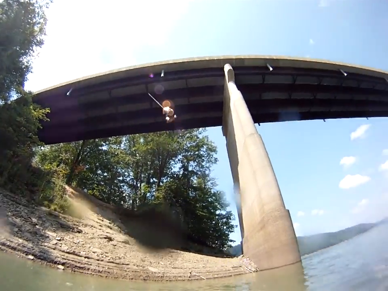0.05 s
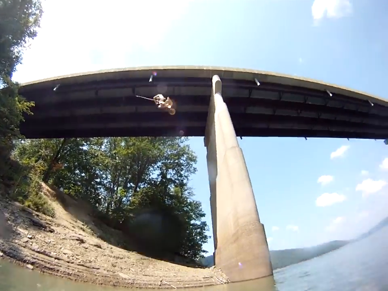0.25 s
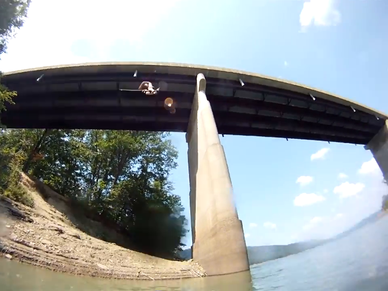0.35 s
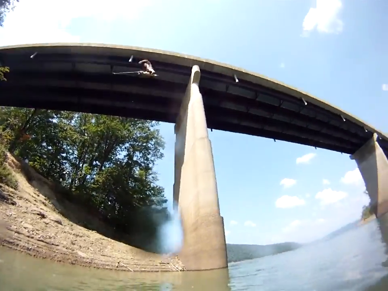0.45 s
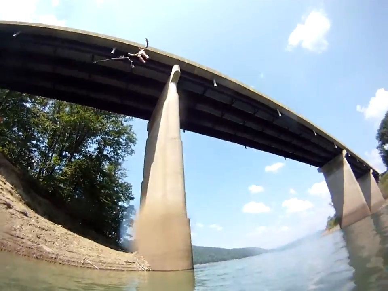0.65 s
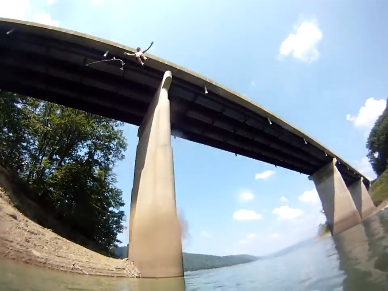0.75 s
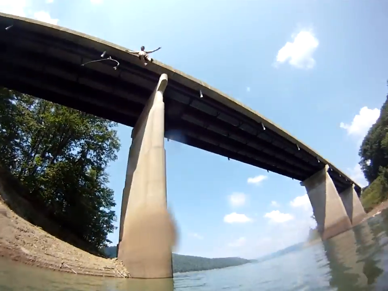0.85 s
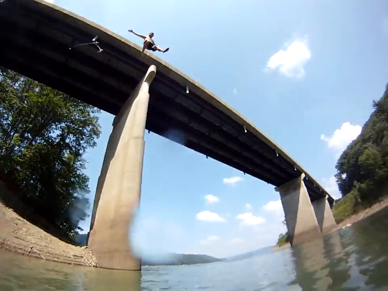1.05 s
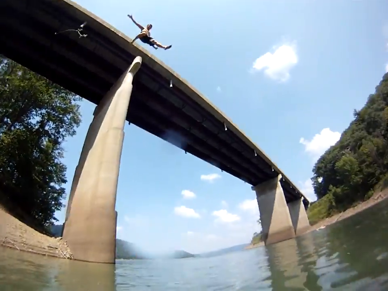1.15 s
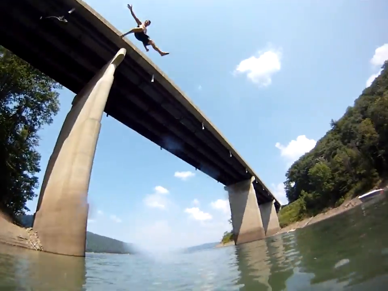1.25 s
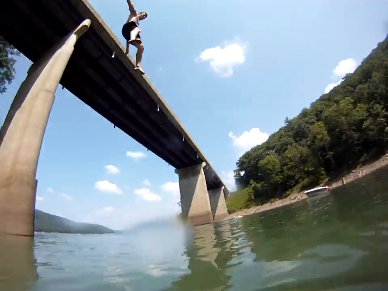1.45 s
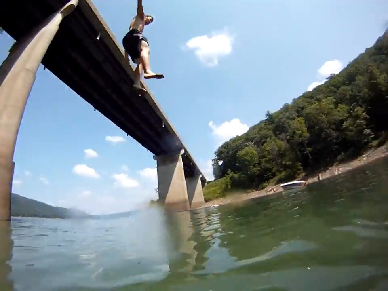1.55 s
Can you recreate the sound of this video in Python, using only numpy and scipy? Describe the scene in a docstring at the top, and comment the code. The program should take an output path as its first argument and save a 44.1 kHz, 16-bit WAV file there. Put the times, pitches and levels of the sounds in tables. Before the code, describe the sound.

A sharp splash knocks right against a microphone housed at the surface of a calm lake. Water briefly sloshes across with a glassy edge and pulls away with a gulp, leaving light drops, gentle lapping and a soft rumble.

```python
"""A quiet lake, where a camera in a waterproof housing bobs at the surface.
Water slaps the housing twice and sets it ringing, washes over it and lets go with a low gulp.
Drops spatter and small bubbles ring over a bed of fine lapping, a faint hollow tone and soft rumble.
A coarse converter mirrors the sound into the treble, which adds a glassy edge."""
import sys
import numpy as np
from scipy import signal
from scipy.fft import rfft, irfft
from scipy.io import wavfile

SR = 44100
rng = np.random.default_rng(int(sys.argv[2]) if len(sys.argv) > 2 else 0)


def log_audio(samples):
    """Write samples as a 16-bit WAV file to the path given in sys.argv[1]."""
    # one column per channel
    frames = np.atleast_2d(samples).T
    # limit to full scale, then quantise
    limited = np.clip(frames, -1, 1)
    pcm = np.round(limited * 32767).astype(np.int16)
    wavfile.write(sys.argv[1], SR, pcm)


N = 70560  # 1.6 s


def undb(db):
    """Decibels to gain."""
    return 10 ** (np.asarray(db) / 20)


def fader(t, points):
    """Gain that rides through (time_s, level_db) points."""
    return undb(np.interp(t, *np.array(points).T))


def swell(t, peak_s, width_s):
    """Bell-shaped envelope that peaks at 1."""
    return np.exp(-.5 * ((t - peak_s) / width_s) ** 2)


def coloured(points, grain_db=0):
    """Unit noise shaped by (freq_hz, gain_db) points; grain roughens it towards a dense crackle."""
    hz, db = np.array(points, float).T
    freqs = np.maximum(np.fft.rfftfreq(N, 1 / SR), 1)
    white = rng.standard_normal(N)
    grains = np.repeat(rng.exponential(size=N // 16 + 1), 16)[:N]  # a new level every 16 samples
    eq = undb(np.interp(np.log(freqs), np.log(hz), db))
    rolloff = 1 + (freqs / hz[-1] / 1.2) ** 8
    noise = irfft(rfft(white * undb(grain_db * grains)) * eq / rolloff, N)
    return noise / noise.std()


def resonant(hz, width_hz):
    """Unit noise ringing in one resonance."""
    noise = signal.lfilter(*signal.iirpeak(hz, hz / width_hz, fs=SR), rng.standard_normal(N))
    return noise / noise.std()


# Deep tone of the rumble: freq_hz, gain_db
RUMBLE_COLOUR = [(12, -7), (25, 10.5), (45, 4.5), (70, -4), (100, -15), (150, -20.5), (250, -38),
                 (500, -47)]
# Its slow swells: time_s, level_db
RUMBLE_FADER = [(0, -40), (.2, -42.5), (.4, -41.5), (.65, -38.5), (.9, -43), (1.25, -40.5), (1.6, -44)]

def rumble(t):
    """The housing rumbles as it moves through the water."""
    return coloured(RUMBLE_COLOUR) * fader(t, RUMBLE_FADER)


# Two soft rises of the hollow tone: time_s, level_db
HOLLOW_FADER = [(0, -80), (.5, -76.5), (.65, -65.5), (.9, -73.5), (1.05, -74.5), (1.13, -64.5), (1.29, -64),
                (1.36, -75), (1.6, -70)]

def hollow_tone(t):
    """A faint, narrow band of noise drifts in and out."""
    return resonant(hz=2150, width_hz=55) * fader(t, HOLLOW_FADER)


# Tone of the lapping: freq_hz, gain_db
LAPPING_COLOUR = [(120, -29.5), (200, -1), (353, -8), (1040, -12.5), (1320, -13.5), (1510, -9),
                  (1840, -11.5), (2260, -10.5), (3070, -17), (3530, -16), (5500, -25), (7150, -59.5),
                  (12100, -120)]
# Its ebb and flow: time_s, level_db
LAPPING_FADER = [(0, -62.5), (.2, -59), (.44, -56.5), (.468, -67), (.5, -63), (.55, -57), (.69, -57.5),
                 (.76, -59), (1.0, -60), (1.25, -61), (1.46, -60), (1.6, -60)]

def lapping(t):
    """Lapping water lays a fine, grainy bed."""
    return coloured(LAPPING_COLOUR, grain_db=1.5) * fader(t, LAPPING_FADER)


# Bubbles, from low gulps to tiny plinks: start_s, level_db, pitch_hz, decay_s, rise_per_s
BUBBLE_NOTES = [(.268, -25, 128, .013, 0.5), (.4245, -15, 510, 0.0019, 1), (0.6, -46, 3130, .002, 3),
                (0.791, -45, 1563, .004, 3.6), (0.806, -47.5, 1502, 0.01, 11.5),
                (.886, -39, 3095, 0.0021, 1), (1.006, -42, 3450, 0.0027, 3.9),
                (1.023, -46.5, 1598, .010, 22)]

def bubbles(t, attack_s=0.00065):
    """Bubbles ring and rise in pitch as they near the surface."""
    out = np.zeros(N)
    for start_s, level_db, pitch_hz, decay_s, rise_per_s in BUBBLE_NOTES:
        age = np.maximum(t - start_s, 0)
        envelope = (1 - np.exp(-age / attack_s)) * np.exp(-age / decay_s)
        phase = 2 * np.pi * pitch_hz * age * (1 + rise_per_s * age / 2)
        out += undb(level_db) * envelope * np.sin(phase)
    return out


# Bright tone of the spatter: freq_hz, gain_db
SPATTER_COLOUR = [(300, -24.5), (1200, -12.5), (2150, 2), (2800, -6.5), (3400, -1), (4100, -13.5),
                  (4700, -5), (5800, 0)]
# Drops landing: peak_s, level_db, width_s, ring_hz, ring_over_spatter_db
DROP_HITS = [(0.277, -43, .0007, 3640, -4), (0.424, -39.5, 0.0024, 3410, 7), (.602, -49, 0.0018, 3300, 2),
             (0.611, -48, .004, 2100, -6), (0.652, -51, 0.0051, 2060, -2.5),
             (.791, -50.5, 0.0013, 4570, -4.5), (.810, -61, 0.0018, 4300, 0),
             (0.826, -47, .0016, 2040, 0.5), (1.394, -53.5, 0.0034, 2235, 1.5),
             (1.436, -52, .003, 4780, -0.5)]

def drops(t):
    """Each drop on the housing is a brief spatter with a ring of its own."""
    out, spatter = np.zeros(N), coloured(SPATTER_COLOUR)
    for peak_s, level_db, width_s, ring_hz, ring_over_spatter_db in DROP_HITS:
        ring = undb(ring_over_spatter_db) * resonant(ring_hz, width_hz=180)
        out += undb(level_db) * swell(t, peak_s, width_s) * (spatter + ring)
    return out


# Tone of the running sheet of water: freq_hz, gain_db
SHEET_COLOUR = [(150, -3), (400, -6), (700, -7.5), (1080, 3), (1400, -4), (1800, -3), (2150, 5),
                (2500, -10), (2900, -12), (3450, -5), (4300, -21), (5300, -16.5), (5900, -30)]
# Its sloshing, ahead of the trim: time_s, level_db
SHEET_FADER = [(.265, -42.5), (.285, -46.5), (.31, -41.5), (.335, -40), (.358, -36), (.375, -46),
               (.391, -34), (.407, -43.5), (.424, -32), (.437, -36.5), (.455, -45.5)]
# Dark tone of the churn: freq_hz, gain_db
CHURN_EQ = [(60, 10), (250, -3.5), (400, 0), (580, -9.5), (800, -9.5), (1200, -14.5), (3400, -28.5),
            (5500, -49)]

def wash(t, start_s=.262, end_s=.459, fade_s=0.0055, sheet_trim_db=-0.5):
    """A grainy sheet of water runs over the housing, churns and breaks off."""
    peak_s, build_s, fall_s, churn_db = .426, 0.015, 0.0031, -21.5
    gate = np.clip((t - start_s) / fade_s, 0, 1) * np.clip((end_s - t) / fade_s, 0, 1)
    sheet = coloured(SHEET_COLOUR, grain_db=1.5) * fader(t, SHEET_FADER) * undb(sheet_trim_db)
    churn_envelope = np.exp(np.minimum((t - peak_s) / build_s, (peak_s - t) / fall_s))
    churn = coloured(CHURN_EQ) * undb(churn_db) * churn_envelope
    return gate * (sheet + churn)


# Gulps as water pulls off the housing: centre_s, level_db, edge_s, decay_s
GULPS = [(.2652, -11.5, 0.0041, 0.0022), (.3585, -15.5, 0.0033, .007), (0.4287, 0.5, .0016, 0.0036),
         (0.598, -19.5, 0.006, 0.0078), (0.637, -24.5, 0.0041, 0.0076), (.688, -27, 0.0073, 0.0099),
         (1.552, -31.5, 0.0021, 0.0066)]
# Dull pushes of water: peak_s, level_db, width_s
THUDS = [(.2440, -26, 0.0025), (0.2563, -9, 0.001), (0.3928, -24.5, 0.00099), (0.409, -20, 0.0044)]

def pressure(t):
    """Water sucks at the housing and snaps back, or simply pushes on it."""
    gulps = sum(undb(level_db) * np.tanh((t - centre_s) / edge_s) * np.exp(-abs(t - centre_s) / decay_s)
                for centre_s, level_db, edge_s, decay_s in GULPS)
    thuds = sum(undb(level_db) * swell(t, peak_s, width_s) for peak_s, level_db, width_s in THUDS)
    return gulps + thuds


# Ringing modes of the housing: pitch_hz, gain_db, t60_s
HOUSING_MODES = [(484, -13.5, 0.024), (860, -16, .02), (1082, -11.5, 0.026), (1730, -10, .02),
                 (2127, -3.5, 0.026), (2869, -2.5, .014), (3430, -11, 0.023), (4495, -6.5, 0.0047)]
# Tone of the crack in a slap: freq_hz, gain_db
CRACK_COLOUR = [(100, -1), (400, 1), (600, 1), (850, 2.5), (1200, -0.5), (2700, -2), (3600, -5), (4500, -5),
                (5800, -12)]
# Hard slaps, then faint ticks: start_s, level_db, pitch_hz, hold_s, roughness (0-1)
SLAP_HITS = [(0.2463, 0.5, 2000, 0.0029, .3), (.2559, -5.5, 1580, 0.001, .2),
             (0.2568, -4.5, 2026, 0.0015, 0.2), (0.2707, -20.5, 1888, 0.00071, 0.22),
             (0.2956, -28.5, 2304, .0014, .35)]

def slaps(t, attack_s=0.00046, release_s=0.0001, driven_db=-9.5, ring_db=-21):
    """The housing buzzes hard while the water strikes it and drives its modes, then rings faintly."""
    out, crack = np.zeros(N), coloured(CRACK_COLOUR)
    for start_s, level_db, pitch_hz, hold_s, roughness in SLAP_HITS:
        age = np.maximum(t - start_s, 0)
        since_release = np.maximum(age - hold_s, 0)
        contact = np.minimum(age / attack_s, 1) * np.exp(-since_release / release_s)
        ring = sum(undb(gain_db - 60 * since_release / t60_s) * np.sin(2 * np.pi * mode_hz * age)
                   for mode_hz, gain_db, t60_s in HOUSING_MODES)
        buzz = np.sin(2 * np.pi * pitch_hz * age) + roughness * crack + undb(driven_db) * ring
        out += undb(level_db) * (contact * buzz + undb(ring_db) * ring)
    return out


# Tone of the faint water noise that widens the bed: freq_hz, gain_db
WIDTH_COLOUR = [(30, 1), (100, -21.5), (300, -21), (1000, -27), (4000, -24.5), (5500, -32.5)]

def scene(bed_side_db=-72.5, wash_side_db=-25, balance_db=0.27):
    """Everything arrives through the housing, nearly mono; moving water adds a little width."""
    t = np.arange(N) / SR
    bed = rumble(t) + hollow_tone(t) + lapping(t)
    mid = bed + bubbles(t) + drops(t) + wash(t) + pressure(t) + slaps(t)
    side = undb(bed_side_db) * coloured(WIDTH_COLOUR) + undb(wash_side_db) * wash(t)
    left_right = np.array([[1], [-1]])
    return mid * undb(left_right * balance_db / 2) + left_right * side


def record(dry):
    """The input overloads; a slow converter hisses and holds each sample, adding glassy treble."""
    input_ceiling, converter_ceiling, hiss_db = 1.4, .95, -74.5
    converter_hz, soften_hz, top_cut_hz = 12000, 5650, 15350
    clipped = np.clip(dry, -input_ceiling, input_ceiling)
    coarse = signal.resample_poly(clipped, converter_hz, SR, axis=1, window=("kaiser", 8))
    coarse = signal.lfilter(*signal.butter(1, soften_hz, fs=converter_hz), coarse)
    hiss = undb(hiss_db) * rng.standard_normal(coarse.shape[1])
    coarse = np.clip(coarse + hiss, -converter_ceiling, converter_ceiling)
    steps = np.repeat(coarse, 4, axis=1)  # held samples mirror the spectrum upwards
    glassy = signal.resample_poly(steps, SR, 4 * converter_hz, axis=1)[:, :N]
    top_cut = signal.ellip(10, .1, 70, top_cut_hz, fs=SR, output="sos")
    return np.clip(signal.sosfiltfilt(top_cut, glassy), -1, 1)


dry = scene()
out = record(dry)
log_audio(out)
```